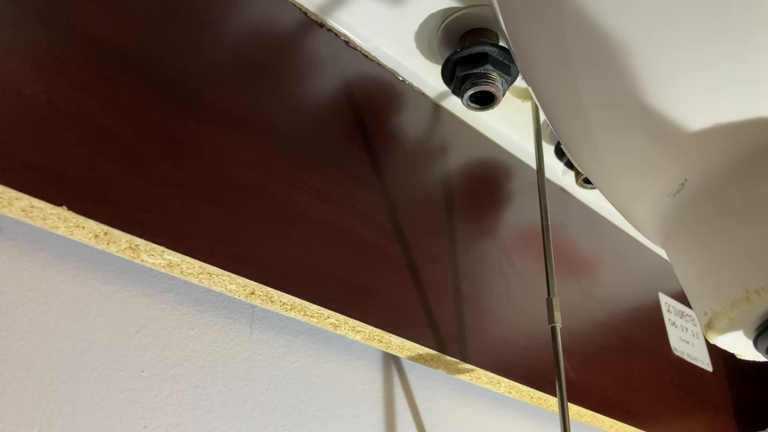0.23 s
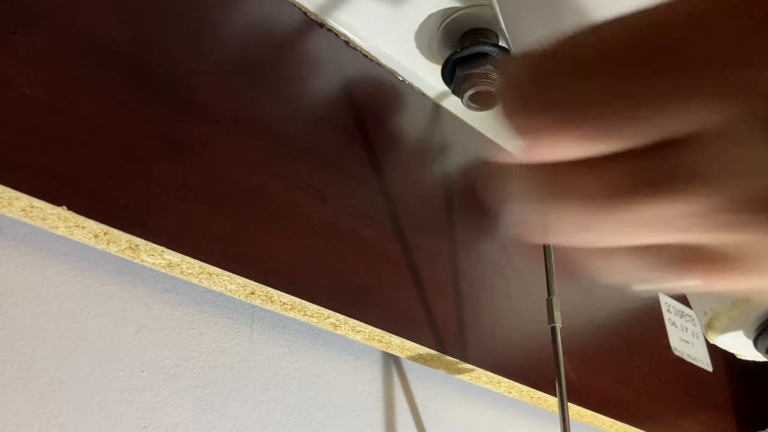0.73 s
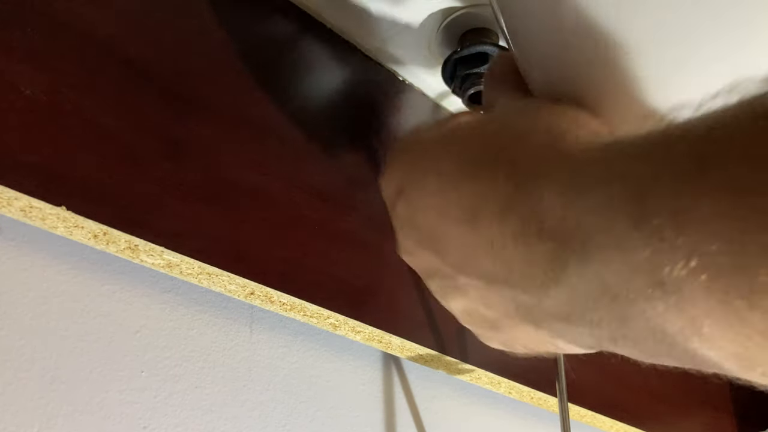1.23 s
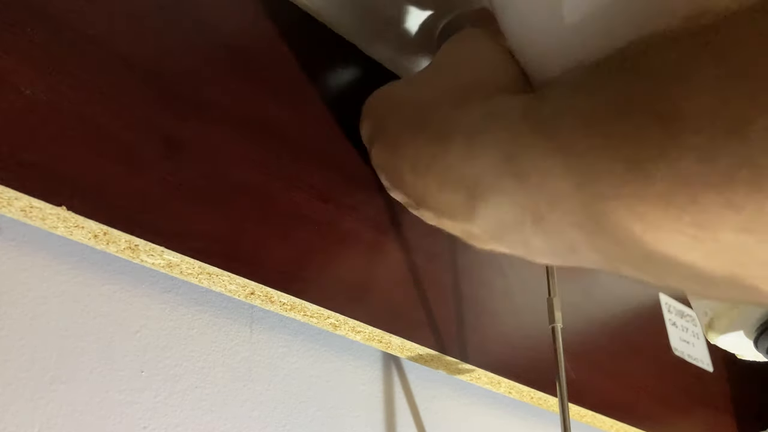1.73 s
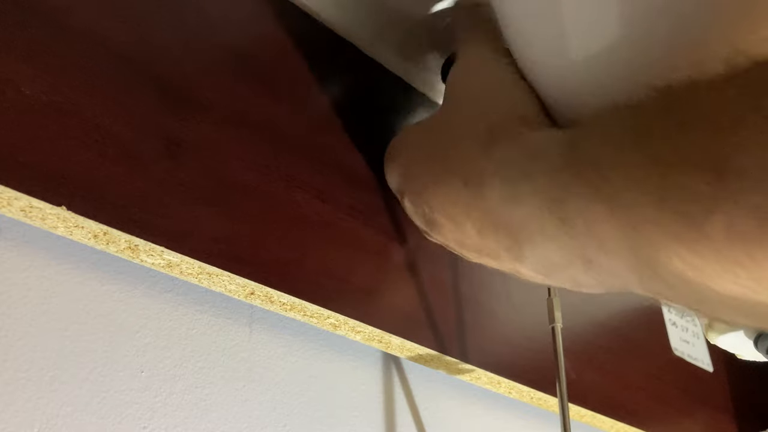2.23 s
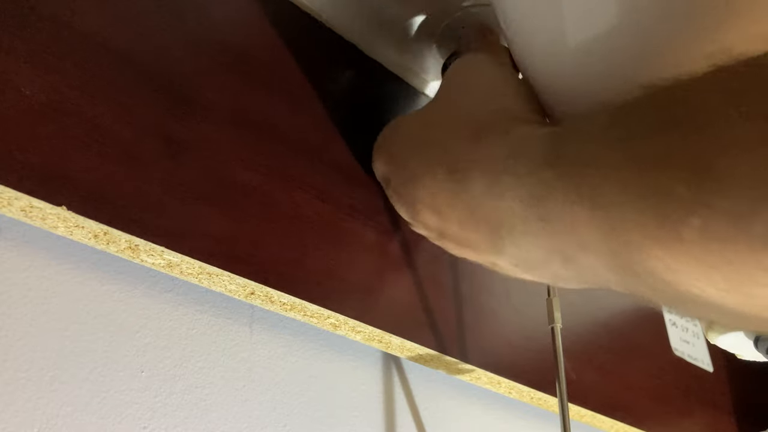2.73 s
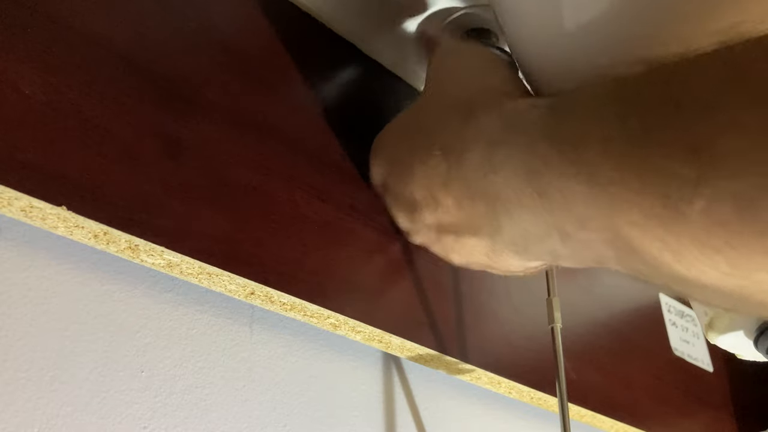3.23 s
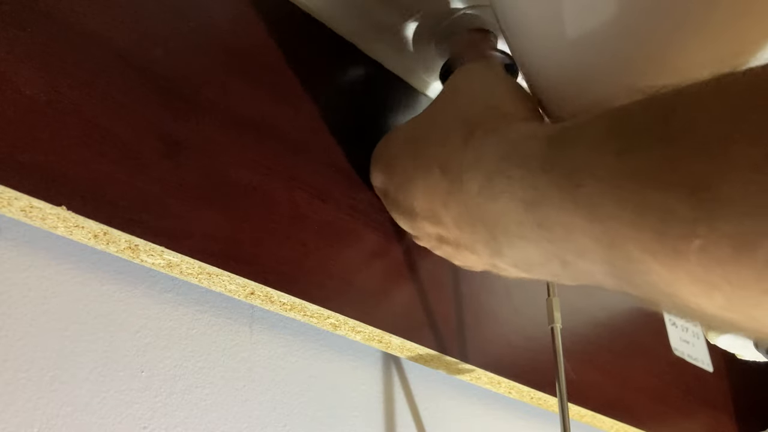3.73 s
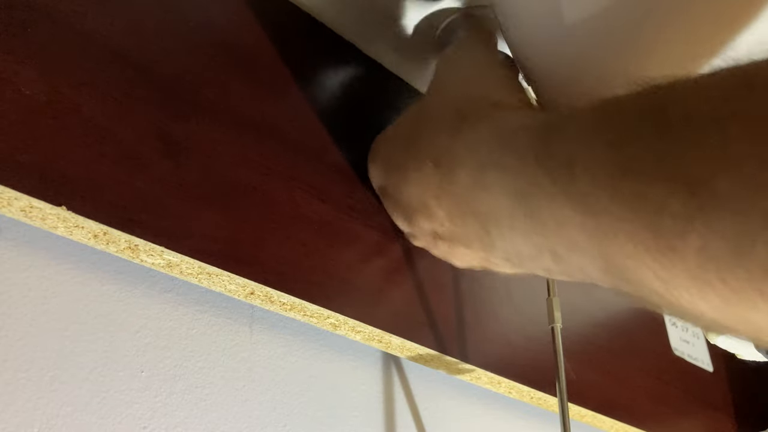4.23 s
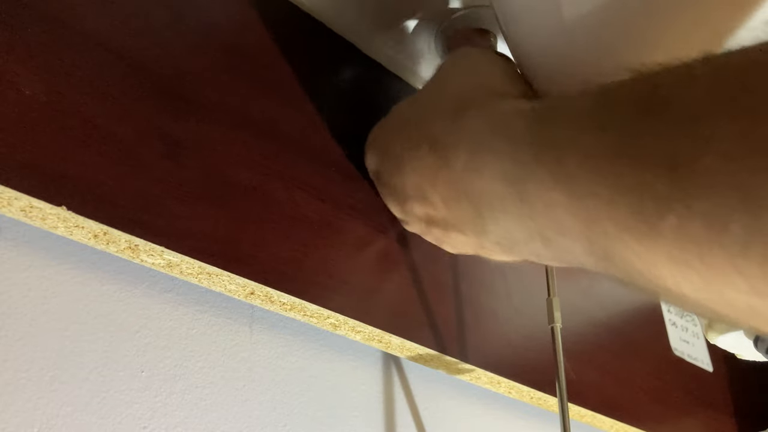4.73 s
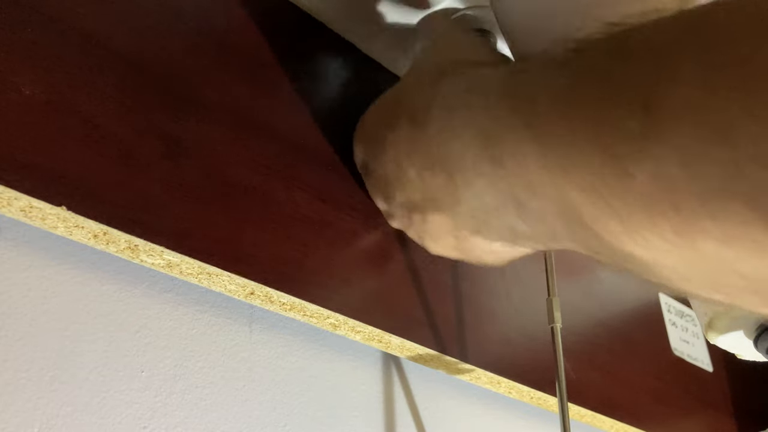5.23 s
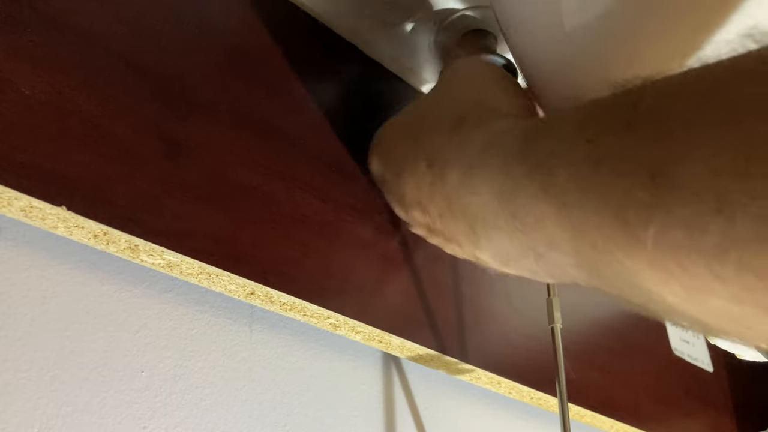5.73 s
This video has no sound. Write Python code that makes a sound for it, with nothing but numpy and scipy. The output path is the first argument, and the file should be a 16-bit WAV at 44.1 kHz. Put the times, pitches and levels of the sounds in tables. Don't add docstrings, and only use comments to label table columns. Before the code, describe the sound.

Fingers unscrew a plastic nut with dry rubs and small clicks inside a cabinet, water dripping hollowly, one sharp metallic knock, soft thumps and low rumble.

```python
import sys
import numpy as np
from scipy import signal
from scipy.fft import rfft, irfft, next_fast_len
from scipy.io import wavfile
from scipy.ndimage import uniform_filter1d

SR = 44100
rng = np.random.default_rng(int(sys.argv[2]) if len(sys.argv) > 2 else 0)


def log_audio(samples):
    frames = np.atleast_2d(samples).T
    limited = np.clip(frames, -1, 1)
    pcm = np.round(limited * 32767).astype(np.int16)
    wavfile.write(sys.argv[1], SR, pcm)


def volts(x):
    e = np.asarray(x, float) / 20
    return 10 ** e


N = 263718

HZ = np.maximum(np.fft.rfftfreq(next_fast_len(N + SR), 1 / SR), 1)
TICKS = np.arange(0, N + 32, 32) / SR
# frequency [Hz], width [Hz], level [dB].
NUT_MODES = [(842, 35, 4), (1140, 17, 9.5), (1400, 54, 16), (1703, 5, 1.5), (2100, 2800, -6), (2470, 41, 7),
             (2700, 13, -39), (3190, 45, 8)]
REACH_S = (1.0045, 1.0295, 1.047)
SLEEVE_OFF_S = 1.16


def at_hz(points):
    hz, db = np.transpose(points)
    return np.interp(np.log(HZ), np.log(np.maximum(hz, 1)), db)


def shape(x, response):
    size = 2 * (len(HZ) - 1)
    return irfft(rfft(x, size) * response, size)[..., :N]


def rms_one(x):
    return x / np.sqrt(np.mean(x ** 2) + 1e-20)


def drift(rate):
    r = np.exp(-2 * np.pi * rate / SR)
    return rms_one(signal.lfilter([1], [1, -2 * r, r * r], rng.standard_normal(N + SR))[SR:])


def resonate(x, peaks):
    out = 0
    for k, (hz, width, db) in enumerate(peaks):
        r = np.exp(-np.pi * width / SR)
        poles = [1, -2 * r * np.cos(2 * np.pi * hz / SR), r * r]
        out = out + (-1) ** k * volts(db) * signal.lfilter([1 - r, 0, r - 1], poles, x)
    return out


def add(out, s, sound):
    i = round(s * SR)
    sound, i = sound[max(-i, 0):], max(i, 0)
    out[i:i + len(sound)] += sound[:N - i]


def mode(hz, t60, rise_s, glide=0, size=SR // 4):
    t = np.arange(size) / SR
    bend = t + glide * (t - 0.046 * (1 - np.exp(-t / 0.035)))
    decay = np.exp(-np.log(1000) * t / t60)
    return np.sin(2 * np.pi * hz * bend) * decay * (1 - np.exp(-(t / rise_s) ** 2))


def drops():
    # start in seconds, tick level in dB, hollow note level in dB, tick pitch in Hz.
    falls = [(-0.004, -42, -43, 1220), (0.066, -46.5, -64, 1200), (0.149, -36.5, -38.5, 960),
             (0.2, -43.5, -50.5, 1210), (0.241, -46, -49.5, 1230), (0.293, -39.5, -44, 950),
             (0.439, -38.5, -39, 890), (0.577, -42.5, -43, 1140), (0.711, -41, -38.5, 1250),
             (0.836, -46, -44.5, 964), (0.958, -42, -39.5, 1330), (1.184, -41.5, -39.5, 970),
             (1.289, -45.5, -46.5, 980), (1.391, -42.5, -42.5, 1140), (1.489, -47, -47, 975),
             (1.581, -44.5, -41.5, 1240), (1.699, -68, -43.5, 934), (1.753, -45, -42, 1230),
             (1.822, -59, -49, 1310), (1.917, -44.5, -44.5, 1280), (1.992, -47, -58, 1185)]
    # frequency in Hz, t60 in seconds.
    tub = [(527.8, 0.085), (960, 0.032), (1254, 0.039), (716, 0.024), (1760, 0.0069), (2570, 0.0064)]
    # frequency in Hz, width in Hz, level in dB.
    drop_tail = [(530, 40, 11), (750, 220, 2), (970, 130, -3), (1250, 75, -7)]
    tail_db, tail_t60_s = -6, 0.28
    out, t = np.zeros(N), np.arange(SR // 4) / SR
    chances = rng.normal(0, 1, (len(falls), len(tub)))
    noises = rng.standard_normal((len(falls), len(t)))
    for (s, tick_db, db, tick_hz), luck, noise in zip(falls, chances, noises):
        since = s - .5
        if since < 0:
            hz, twin_hz, bend, over_db = 220.3, 245.3, 0.042, db - 12.5
        else:
            hz, twin_hz, bend = 267 + 4.5 * since, 300, 0.13
            over_db = db - 2.5 - 7.5 * since
        twin = volts(-13 + 2.0 * luck[1]) * mode(twin_hz * (1 + 0.022 * luck[2]), .2, 0.012)
        add(out, s + 0.00074, volts(db + 16.5) * (mode(hz, 0.097, 0.0053, glide=bend) + twin))
        over_hz, over_t60 = tub[0]
        overtone = mode(over_hz * (1 + 0.0092 * luck[-1]), over_t60 * volts(1.76 * luck[-1]), 0.0052)
        add(out, s + 0.00449, volts(over_db + 10.0) * overtone)
        add(out, s + 0.0042, volts(over_db - 0.5) * mode(500 * (1 + 0.032 * luck[-2]), 0.11, 0.013))
        wall = sum(volts(2.0 * e - 3) * mode(f * (1 + .02 * e), t60, 0.00055)
                   for (f, t60), e in zip(tub[1:], luck))
        add(out, s - .001, volts(tick_db) * (0.92 * mode(tick_hz, 0.017, 0.0012) + wall))
        add(out, s, volts(tick_db + tail_db - 60 * t / tail_t60_s) * resonate(noise, drop_tail))
    return out


def stroke(s, rise_s, fall_s):
    t = TICKS - s
    return volts(-2 * 21.5 * np.where(t < 0, -t / rise_s, t / fall_s) ** 0.87)


def lifted():
    lifts = [
        1.929,
        2.363,
        2.719,
        3.6,
        4.616,
    ]
    dips = sum(np.exp(-((TICKS - s) / 0.036) ** 2) for s in lifts)
    return -10 * np.interp(np.arange(N) / SR, TICKS, dips)


def contact():
    # peak in seconds, half length in seconds, body dB, skin dB.
    turns = [(0.0, 0.16, -51.5, -48.5), (0.376, 0.21, -65.5, -60.5), (1.25, 0.11, -70.5, -60.5),
             (1.487, 0.19, -84, -57), (1.57, 0.14, -75, -49.5), (1.742, 0.47, -57, -57.5),
             (2.068, 0.049, -48, -47), (2.113, 0.048, -40, -42), (2.229, 0.35, -64.5, -57),
             (2.476, 0.067, -42, -36), (2.609, 0.18, -53, -48.5), (2.841, 0.078, -46.5, -47.5),
             (3.103, 0.13, -55, -52), (3.197, 0.083, -48, -49), (3.444, 0.14, -60, -53.5),
             (3.529, 0.099, -43.5, -49.5), (3.815, 0.048, -37.5, -42), (3.994, 0.89, -60, -58),
             (4.08, 0.059, -66, -54), (4.145, 0.048, -41.5, -46.5), (4.34, 0.35, -64, -55),
             (4.477, 0.15, -50.5, -53.5), (4.815, 0.097, -44.5, -46.5), (5.084, 0.043, -47, -44.5),
             (5.194, 0.084, -49.5, -39), (5.38, 0.035, -48.5, -55.5), (5.478, 0.057, -39, -38.5),
             (5.65, 0.082, -54, -46.5), (5.784, 0.049, -36.5, -39), (5.939, 0.058, -54, -42)]
    # peak in seconds, skin level in dB.
    regrips = [(0.187, -46.5), (0.524, -49.5), (1.843, -51), (2.56, -71), (2.771, -43), (2.948, -44),
               (3.008, -44.5), (3.255, -45), (3.317, -51), (3.675, -49.5), (4.287, -48.5), (4.548, -49.5),
               (4.679, -51.5), (4.996, -48), (5.299, -41), (5.577, -83), (5.901, -58)]
    rows = [(s, half, 0.9 * half, body_db, skin_db) for s, half, body_db, skin_db in turns]
    rows += [(s, 0.046, 0.046, db - 16, db) for s, db in regrips]
    release_s, extra_db = (0.018, 0.061, 0.062), (3, 1, -1.5)
    rows += [(s, .0015, fall, -43 + db, -45.5 + db) for s, fall, db in zip(REACH_S, release_s, extra_db)]
    power = volts(2 * -78)
    for s, rise, fall, *db in rows:
        power = power + np.outer(volts(2 * np.array(db)), stroke(s, rise, fall))
    loss = lifted()
    return [np.interp(np.arange(N) / SR, TICKS, 10 * np.log10(p)) + loss for p in power]


def grains(per_s, spread_db):
    size = volts(spread_db * np.minimum(rng.exponential(1, N), 3.5)) * rng.choice([-1, 1], N)
    return size * (rng.random(N) < per_s / SR)


def rubbing():
    # frequency in Hz, level in dB per Hz.
    rub_body = [(290, -6), (500, -8), (1010, -9.5), (1480, -4.5), (2790, -13), (3140, -8), (4500, -61),
                (5850, -20), (9900, -120)]
    rasp_colour = [(2200, -47), (3000, -7.5), (3900, -3), (5000, -2), (6000, -4.5), (6800, -9)]
    skin_colour = [(5600, -25), (6500, -10), (7500, -3), (9200, -2), (11500, -4.5), (14000, -9.5),
                   (15500, -7.5), (16000, -29)]
    # frequency in Hz, width in Hz, level in dB.
    cloth = [(765, 69, 18.5), (2030, 380, 3), (2770, 220, 12), (3950, 180, 11), (5670, 69, 2)]
    body_db, skin_db = contact()
    slips = grains(450, 6.5) + 1.1 * np.array([grains(900, 4.5), grains(900, 4.5)])
    nut = sum(volts(3 * drift(21)) * resonate(slips, [peak]) for peak in NUT_MODES)
    body = rms_one(nut) * 0.61 + rms_one(shape(slips[::-1], volts(at_hz(rub_body))))
    coarse = shape(slips + grains(5000, 4.8), volts(at_hz(rasp_colour)))
    rasp = rms_one(sum(volts(4 * drift(4.8)) * resonate(coarse, [(hz, 600, 0)])
                       for hz in np.arange(2600, 7000, 900)))
    fine, upper = grains(9000, 0.47), 1 / (1 + (9500 / HZ) ** 12)
    skin = sum(volts(2.0 * drift(3.3)) * shape(fine, volts(at_hz(skin_colour)) * part)
               for part in (upper, 1 - upper))
    sleeve = np.arange(N) < SLEEVE_OFF_S * SR
    reaching = (np.arange(N) > (REACH_S[0] - .01) * SR) & sleeve
    rough = drift(21.5) * ~reaching
    rasp_db = 0.42 * body_db + 0.61 * skin_db - 12.5 + 11.5 * sleeve
    low = volts(body_db + 4.1 * rough - 1.0) * rms_one(body) + volts(rasp_db + 1.52 * rough) * rasp
    low = low + volts(body_db - 4) * sleeve * rms_one(resonate(slips + grains(2600, 4.7), cloth))
    return low + volts(skin_db + 3.63 * rough - 4.5) * rms_one(skin)


def clicks():
    # time in seconds, peak level in dB,
    # pitch in Hz.
    click_rows = [(1.6115, -36, 1430), (1.6482, -41.5, 1580), (2.1979, -38.5, 1510), (2.5092, -33, 1530),
                  (2.513, -39.5, 3100), (2.489, -35, 1530), (2.539, -43, 1700), (2.438, -47, 1440),
                  (2.586, -52, 910), (2.619, -42, 2200), (2.602, -38, 1750), (2.6668, -48, 1430),
                  (2.8465, -33.5, 1800), (2.9144, -45, 1140), (2.81, -52, 1470), (3.0438, -42, 1540),
                  (3.046, -42.5, 2530), (2.47, -44, 3240), (2.129, -38.5, 1510), (2.214, -42.5, 1400),
                  (3.125, -47, 1460), (3.199, -49, 1300), (3.244, -46, 2470), (3.403, -47, 860),
                  (3.4092, -46.5, 1440), (3.4619, -39, 1430), (3.5409, -33.5, 1370), (4.0068, -36, 1950),
                  (4.126, -45, 1440), (4.2112, -40, 1140), (4.3082, -42.5, 1870), (4.8205, -42, 2520),
                  (4.9917, -45, 2040), (4.996, -49.5, 1400), (4.829, -37, 1166), (5.118, -47.5, 1400),
                  (5.7773, -41, 1520),
                  (1.007, -45, 1140), (1.0058, -39, 3950), (1.0068, -45, 2400), (1.0296, -46, 2230),
             (1.0305, -49, 3950), (1.048, -43, 3980), (1.072, -44, 5670), (1.638, -51, 2280),
             (1.654, -56, 1920), (1.036, -34, 2720), (1.6238, -50, 1400), (1.6696, -52, 964),
             (1.8357, -53, 1300), (2.0642, -52, 1290), (2.099, -40, 1860), (2.2635, -50, 1290),
             (2.3032, -52.5, 1750), (2.3261, -49.5, 970), (2.385, -50.5, 1280), (2.4785, -42, 1480),
             (2.581, -44.5, 1130), (3.1824, -48, 1390), (3.685, -52, 1930), (3.731, -50.5, 1400),
             (3.7903, -53, 1350), (3.8037, -45, 2300), (3.817, -35, 2230), (4.0655, -47, 1140),
             (4.355, -49, 1440), (4.448, -52, 1100), (4.5276, -51, 1400), (4.7516, -52, 1400),
             (4.7874, -45, 1320), (5.455, -47, 1340), (5.6374, -57, 1140), (5.7089, -51, 1100),
             (5.741, -41, 1430)]
    rows = sorted(click_rows)
    out, t, size = np.zeros(N), np.arange(500) / SR, SR // 20
    chances = rng.normal(0, 1, (len(rows), len(NUT_MODES), 2))
    pushes = rng.standard_normal((len(rows), len(t)))
    for (s, db, hz), luck, push in zip(rows, chances, pushes):
        body = sum(volts(0.56 * d + 2.5 * e - 10) * mode(f * (1 + 0.035 * g), 0.0097, 0.00031, size=size)
                   for (f, width, d), (e, g) in zip(NUT_MODES, luck))
        push = push * volts(-60 * t / 0.016)
        edge = volts(-12.0) * mode(3900, 0.0076, .0001, size=size)
        note = mode(hz, .014, .0004, size=size)
        ring = signal.fftconvolve(note + body + edge, push / np.linalg.norm(push))
        add(out, s - .001, volts(db + 4.0) * ring)
    return out


def snaps():
    # time in seconds, peak level in dB, centre in Hz.
    releases = [(0.152, -34, 10400), (0.1863, -32.5, 10500), (0.505, -39, 4570), (0.9028, -44.5, 13400),
                (1.005, -51, 3950), (2.061, -44, 11800), (2.471, -23, 9900), (2.5657, -38, 9970),
                (2.771, -60, 10700), (2.851, -34.5, 6450), (3.171, -33.5, 11100), (5.1885, -29, 11000),
                (5.449, -33.5, 10700), (5.57, -37, 11000), (5.734, -36, 7460), (5.794, -23, 10200),
                (5.89, -32.5, 10400), (5.9005, -26.5, 8150)]
    out, t = np.zeros(N), np.arange(SR // 8) / SR
    bright = signal.butter(2, [2800, 15000], "band", fs=SR, output="sos")
    decay = volts(-60 * t / .028) + 0.36 * volts(-60 * t / 0.1)
    for (s, db, hz), noise in zip(releases, rng.standard_normal((len(releases), len(t)))):
        colour = signal.sosfilt(bright, noise) * 0.61 + rms_one(resonate(noise, [(hz, 1200, 0)])) * .5
        add(out, s - .001, volts(db - 9.5) * decay * colour)
    return out


def knock():
    # time in seconds, peak level in dB.
    contacts = [
        (1.6095, -36.5),
        (3.849, -11),
        (3.8512, -15),
        (3.8558, -20),
        (3.8605, -18.5),
        (3.868, -41),
        (3.8861, -19.5),
        (3.894, -25),
        (3.903, -35),
    ]
    # frequency in Hz, level in dB, t60 in seconds.
    stem = [(969, -21, .5), (1141, -14, .15), (1386, 5, .15), (1464, -3, .14), (1653, -4, .1),
            (1763, -6, .1), (2007, -11, .12), (2320, -10, .07), (2420, -4, .08), (2519, -11, .14),
            (3400, -11, .15), (3780, -13, .15), (4340, -16, .15), (4880, -13, .12), (4935, -9, .17),
            (5740, -12, .12), (5930, -5, .12), (7100, -17, .1), (8600, -11, .05), (10850, -16, .1),
            (11770, -8, .07), (12600, -7, .07), (14100, -13, .06), (14900, -8, .07), (9290, 1, .1)]
    # frequency in Hz, width in Hz, level in dB.
    crack = [(2390, 140, 20), (5500, 700, 9), (12560, 740, 14), (15800, 1000, -3)]
    out, t = np.zeros(N), np.arange(SR // 2) / SR
    chances = rng.normal(0, 1, (len(contacts), len(stem), 2))
    noises = rng.standard_normal((len(contacts), len(t)))
    for (s, db), luck, noise in zip(contacts, chances, noises):
        ring = 0
        for (f, d, t60), (e, g) in zip(stem, luck):
            partial = mode(f * (1 + .002 * g), t60, 0.0003, size=len(t))
            ring = ring + np.sign(e) * volts(d + 0.87 * e) * partial
        add(out, s, volts(db - 11.5) * ring * (volts(-60 * t / 0.014) + 0.3))
        swell = 1 - np.exp(-t / 0.00097)
        add(out, s, volts(db - 9.5 - 60 * t / 0.02) * swell * resonate(noise, crack))
    return out


def thumps():
    # time in
    # seconds, peak level in dB, pitch in Hz.
    soft_blows = [(1.078, -32, 275), (2.069, -35, 267), (2.104, -30, 339), (2.135, -27.5, 331),
                  (2.207, -31, 302), (2.332, -35, 278), (2.45, -35, 278), (2.488, -31.5, 262), (2.522, -29, 350),
                  (2.609, -31, 337), (3.049, -34.5, 321), (3.117, -31.5, 303.3), (3.637, -35.5, 330),
                  (3.684, -38, 298), (3.756, -32.5, 310), (3.809, -32, 462), (3.82, -33, 409), (3.856, -30, 300),
                  (3.866, -40, 291), (3.13, -35.5, 301), (3.953, -41, 319), (4.26, -38, 306),
                  (4.392, -32.5, 316), (4.863, -28, 313), (5.057, -29, 279), (5.218, -31.5, 303),
                  (5.426, -25, 266),
                  (1.995, -41, 277), (2.303, -44, 316), (2.809, -68, 266), (3.02, -65, 274),
              (3.094, -33.5, 307), (3.292, -46, 315), (3.495, -68, 275), (4.012, -40.5, 316),
              (4.218, -40, 352), (4.435, -50, 267), (4.543, -63, 308), (4.75, -42, 224), (4.905, -56, 305),
              (5.181, -37, 297), (5.271, -42, 337), (5.716, -40.5, 305), (5.77, -48, 327)]
    raps = [(1.007, -33, 311), (1.045, -36.5, 344), (2.85, -37, 293), (3.418, -43, 347), (3.538, -36, 358),
            (3.831, -29, 439), (3.84, -32.5, 500), (4.994, -47, 451), (5.055, -50, 576), (4.82, -41, 405),
            (4.838, -25.5, 267), (4.963, -42, 330), (5.113, -22, 291.7), (5.128, -31.5, 288),
            (5.373, -35, 254), (5.518, -32.5, 323), (5.605, -33.5, 316), (5.812, -35, 317),
            (5.936, -34.5, 310)]
    bumps = [(1.013, -32, 128.7), (1.057, -30.5, 127), (1.705, -41, 156.4), (2.06, -35, 82),
             (2.451, -35, 150), (3.294, -33.5, 119), (3.644, -32, 119.3), (3.712, -34.5, 96),
             (3.959, -33, 132), (4.049, -33.5, 94.3), (4.27, -33.5, 119.4), (4.659, -35, 113.4),
             (4.85, -29.5, 142.4), (4.967, -33, 126.6), (5.074, -32.5, 143.8), (5.215, -33, 123),
             (5.28, -30, 113.4), (5.616, -30.5, 121), (5.851, -34.5, 59.3), (5.939, -29, 114)]
    out, t = np.zeros(N), np.arange(600) / SR
    soft = [(*row, -17, 0.0036) for row in soft_blows]
    hard = [(*row, -6.5, 0.0019) for row in raps]
    blows = sorted(soft + hard)
    chances = rng.normal(0, 1, (len(blows), 2))
    pushes = rng.standard_normal((len(blows), len(t)))
    for (s, db, hz, hard_db, rise_s), luck, push in zip(blows, chances, pushes):
        near = volts(-10.5) * mode(hz * (1.1 + 0.0908 * luck[0]), 0.18, 0.0065)
        below = volts(6.5) * mode(0.71 * hz, 0.05, 0.014)
        add(out, s - .003, volts(db + 3.0) * (mode(hz, 0.068, rise_s) + near + below))
        upper = mode(534.3, 0.06, 0.0047) + mode(620 + 20 * luck[1], 0.025, 0.0016)
        upper = upper + mode(462.0, 0.039, 0.0012)
        push = (0.48 + push) * volts(-60 * t / 0.0035) + 0.29 * push * volts(-60 * t / 0.045)
        ring = signal.fftconvolve(upper, push / np.linalg.norm(push))
        add(out, s - .003, volts(db + hard_db + 0.5) * ring)
    for s, db, hz in bumps:
        add(out, s - .01, volts(db + 8.0) * mode(hz, 0.16, 0.017))
    return out


def rumble():
    # time in seconds, rumble level in dB.
    pressure = [(0.0, -47.5), (0.75, -51), (1.1, -46), (1.5, -47.5), (2.6, -44.5), (3.3, -47.5),
                (3.85, -42), (4.1, -46.5), (4.6, -47), (5.06, -43.5), (5.4, -38.5), (5.61, -42.5),
                (5.98, -45)]
    # frequency in Hz, width in Hz, level in dB.
    deep_modes = [(51.6, 15.5, -4.5), (71.7, 19.3, -8.5), (92.5, 7.8, -1.5), (143.8, 33.7, -12.5),
                  (29.8, 5.1, -62)]
    panel_modes = [(221, 28.3, 2.5), (282, 9.1, 2), (315.4, 17, -0.5), (497, 13, -40), (511, 19, -27.5)]
    deep_db = np.interp(np.arange(N) / SR, *np.transpose(pressure))
    panel_db = -54.5 + 0.72 * (deep_db - deep_db.mean()) + 0.16 * (contact()[0] + 60)
    deep = rng.standard_normal(N) + volts(-13) * rng.standard_normal((2, N))
    deep = rms_one(resonate(resonate(deep, deep_modes), [(81.6, 200, 0)]))
    panel = rng.standard_normal(N) + volts(-9) * rng.standard_normal((2, N))
    panel = rms_one(resonate(resonate(panel, panel_modes), [(288, 480, 0)]))
    lumps = 3 * drift(18)
    return volts(deep_db) * deep + volts(panel_db + lumps) * panel


def ports(x):
    # frequency in Hz, lead of the left port in radians.
    port_phase = [(0, 0), (500, .4), (1500, -1.5), (2200, 0), (2900, 3.1), (3300, 4.1), (4200, 5.8),
                  (5500, 8.6), (6400, 6.9)]
    # frequency in Hz, left minus right in dB.
    port_balance = [(50, -1), (150, 0), (300, 2.5), (800, 4), (1500, 2), (4000, 1.5), (6400, 0)]
    # frequency in Hz, level in dB.
    cabinet = [(40, -26), (150, -18), (400, -6), (800, 3), (2200, 2), (2800, -3), (6000, -2), (6600, -30),
               (16000, -36)]
    t = np.arange(SR // 2) / SR
    echoes = rng.standard_normal((2, len(t))) * volts(-60 * t / 0.066) * (t > .001)
    echoes = echoes / np.linalg.norm(echoes, axis=1, keepdims=True)
    echoes = rfft(echoes, 2 * (len(HZ) - 1)) * volts(at_hz(cabinet))
    low_lead = np.interp(HZ, *np.transpose(port_phase))
    top_lead = 5 * np.pi - 2 * np.pi * HZ / 4570
    lead = np.where(HZ < port_phase[-1][0], low_lead, top_lead)
    side = np.array([[.5], [-.5]])
    heard = np.exp(1j * side * lead) + echoes
    heard = heard / np.sqrt(uniform_filter1d(abs(heard) ** 2, size=400, axis=1))
    return shape(x, heard * volts(side * at_hz(port_balance)))


def scene():
    top = 1 / (1 + (6400 / HZ) ** 16)
    rub = rubbing()
    rub = shape(rub, 1 - top) + shape(rub[0], top)
    return ports(drops() + rub + clicks() + snaps() + knock() + thumps() + rumble())


def roll_off(x):
    return signal.sosfilt(signal.butter(12, 17100, fs=SR, output="sos"), x)


def record(dry):
    # frequency in Hz, level in dB per Hz.
    hiss_colour = [(300, -28), (500, 2), (1500, -0.5), (3000, -3), (6000, -10.5), (7000, -31)]
    hiss = volts(-80.5) * rms_one(shape(rng.standard_normal((2, N)), volts(at_hz(hiss_colour))))
    top_cut = signal.cheby2(10, 60, 17100, fs=SR, output="sos")
    return roll_off(signal.sosfilt(top_cut, dry + hiss))


dry = scene()
out = record(dry)
log_audio(out)
```